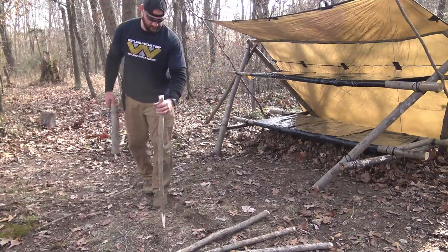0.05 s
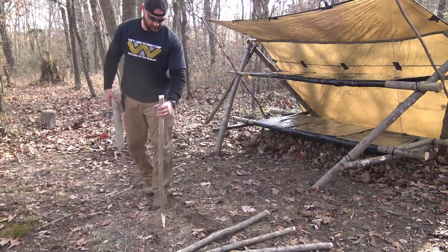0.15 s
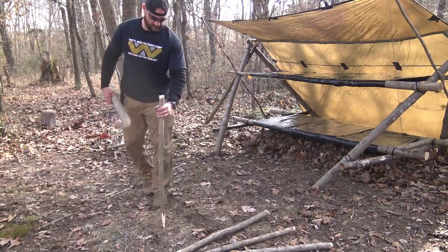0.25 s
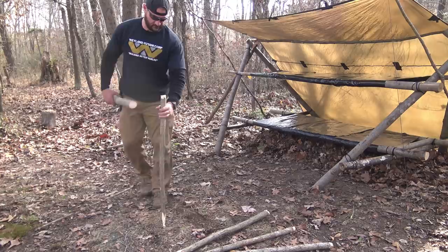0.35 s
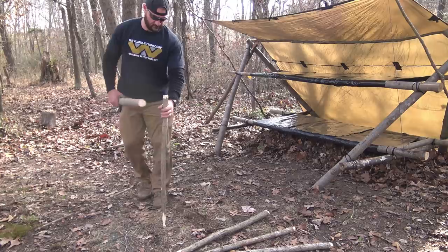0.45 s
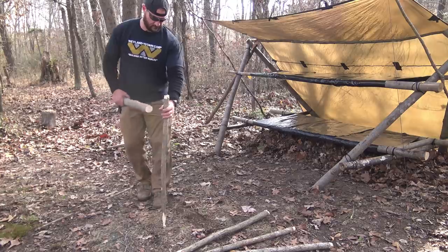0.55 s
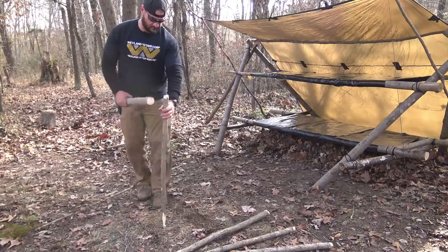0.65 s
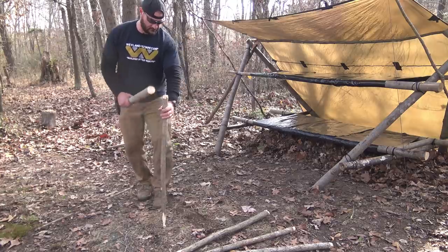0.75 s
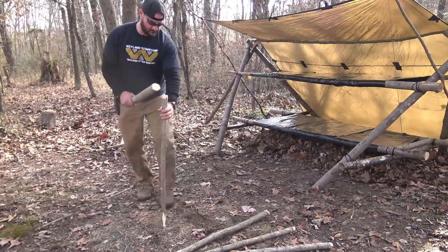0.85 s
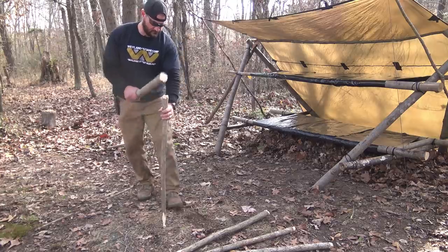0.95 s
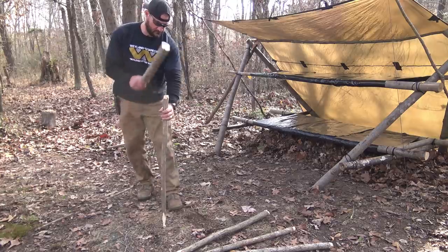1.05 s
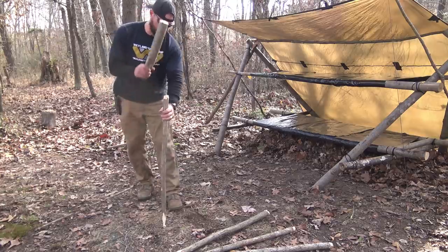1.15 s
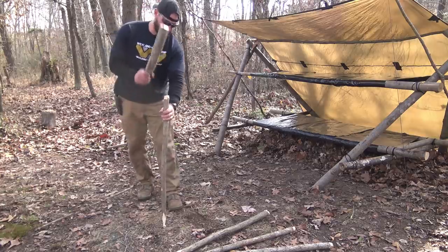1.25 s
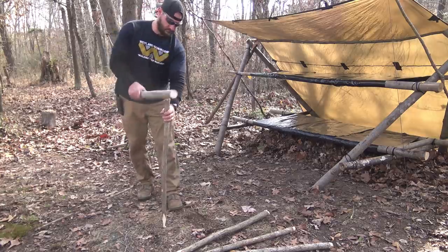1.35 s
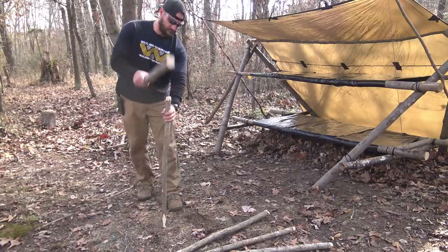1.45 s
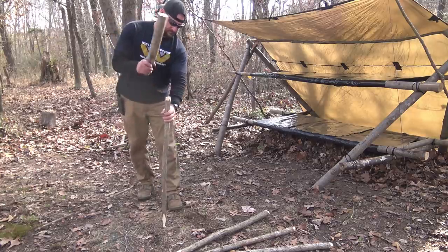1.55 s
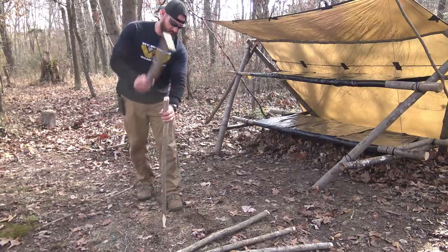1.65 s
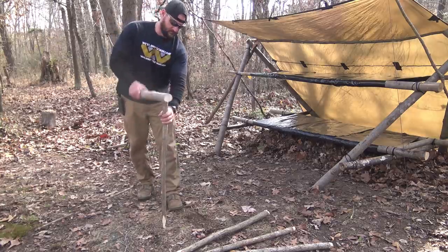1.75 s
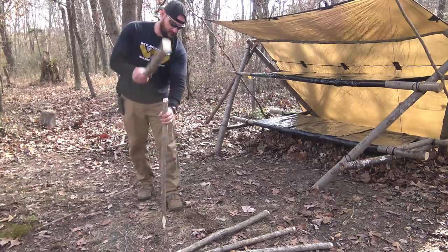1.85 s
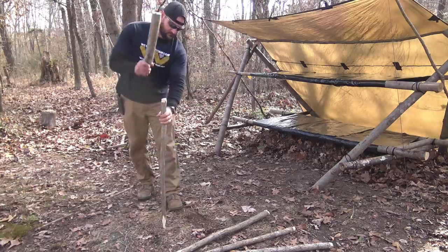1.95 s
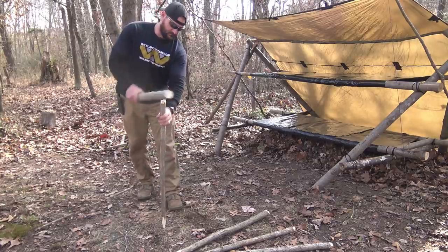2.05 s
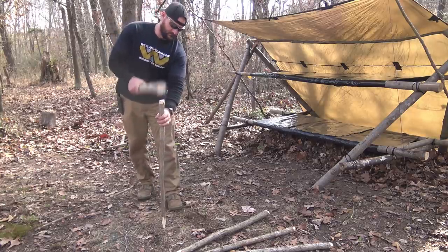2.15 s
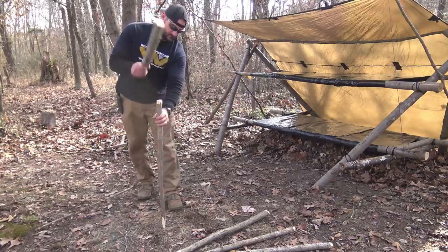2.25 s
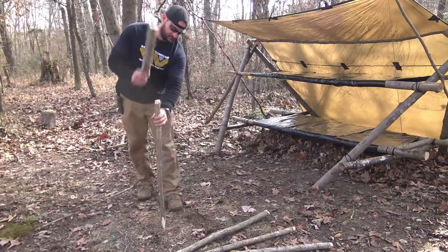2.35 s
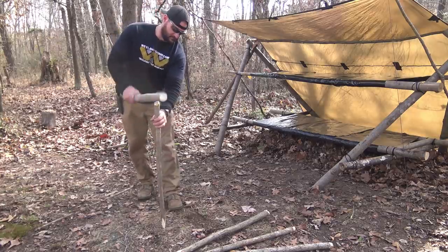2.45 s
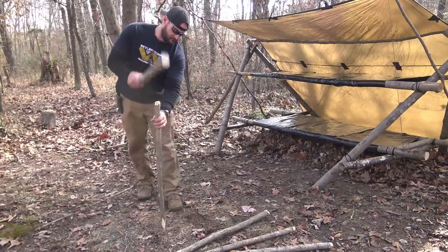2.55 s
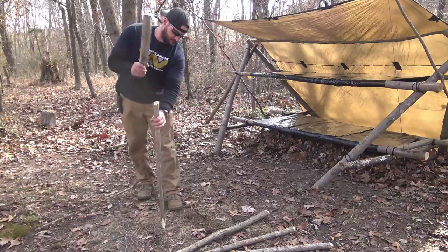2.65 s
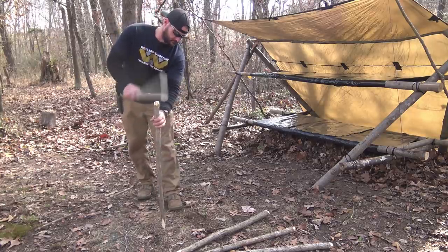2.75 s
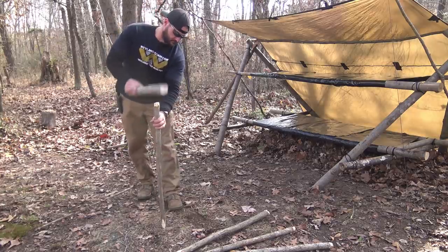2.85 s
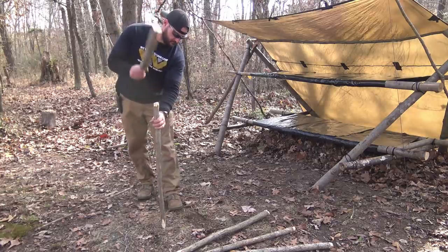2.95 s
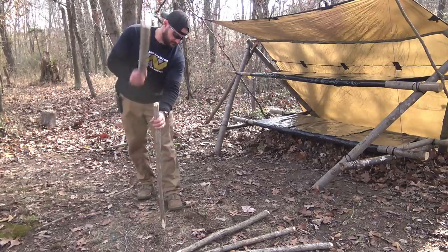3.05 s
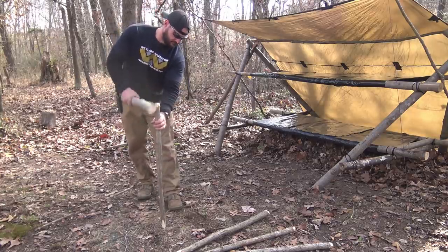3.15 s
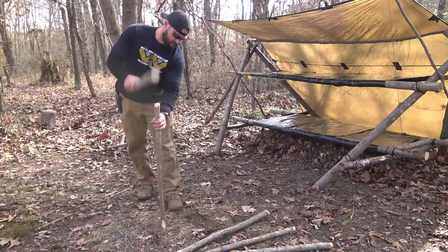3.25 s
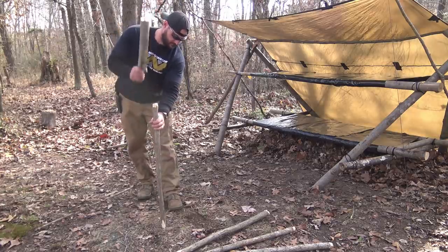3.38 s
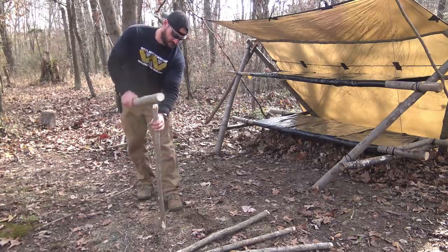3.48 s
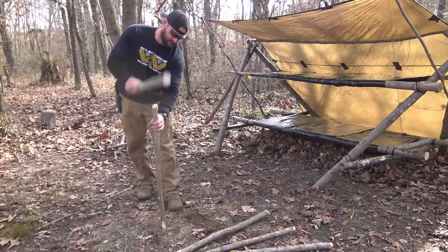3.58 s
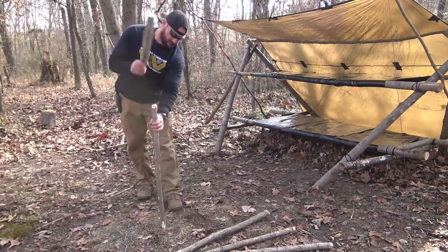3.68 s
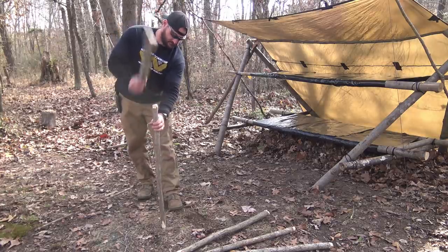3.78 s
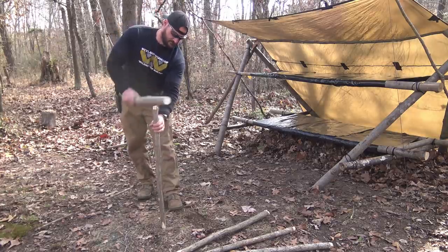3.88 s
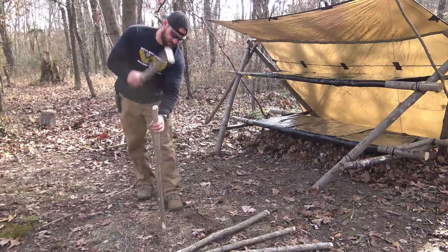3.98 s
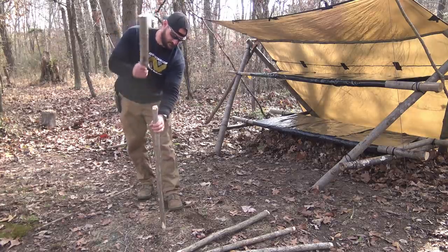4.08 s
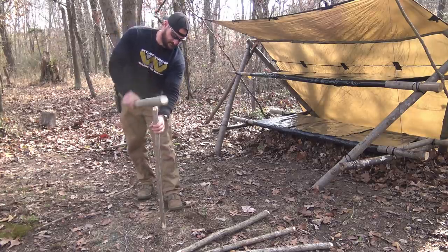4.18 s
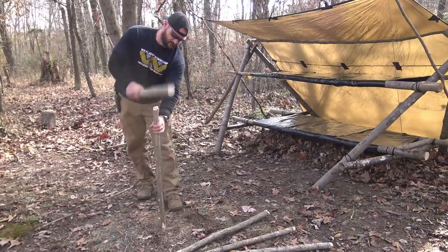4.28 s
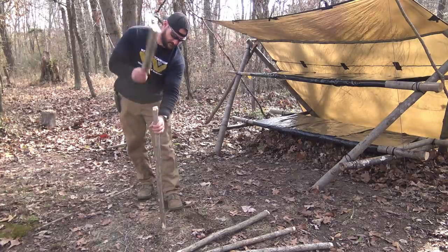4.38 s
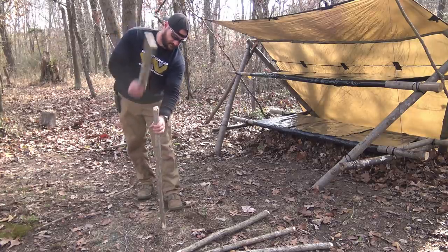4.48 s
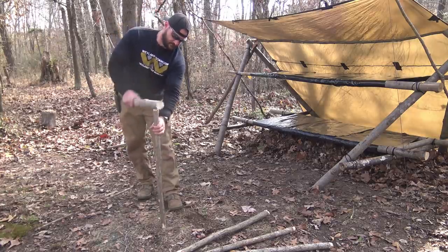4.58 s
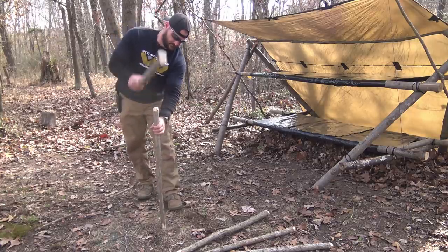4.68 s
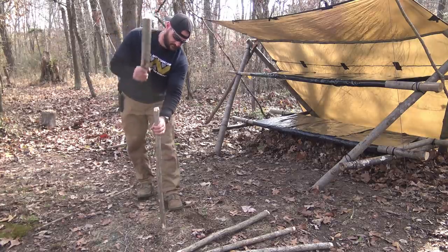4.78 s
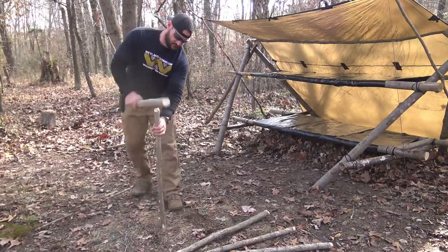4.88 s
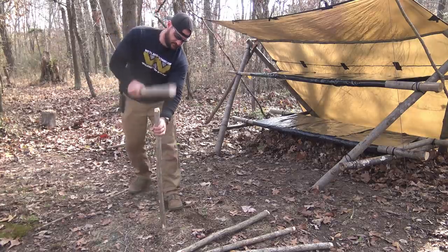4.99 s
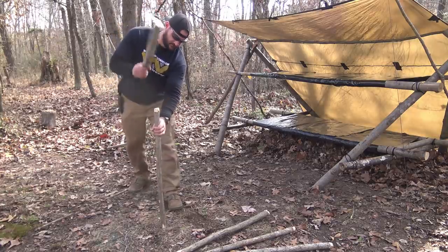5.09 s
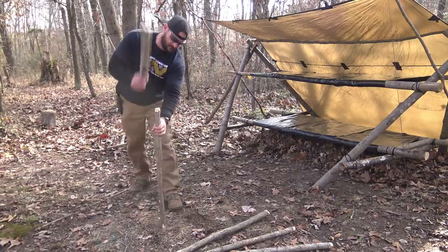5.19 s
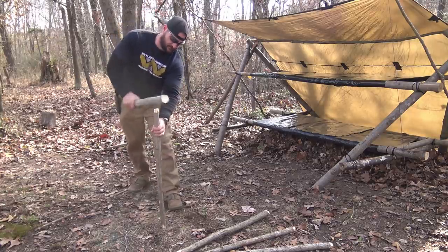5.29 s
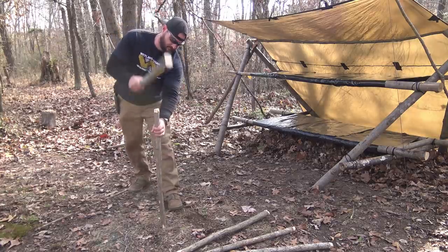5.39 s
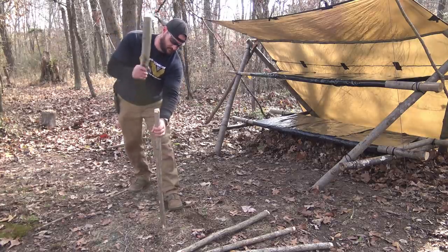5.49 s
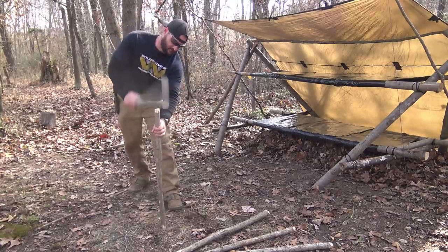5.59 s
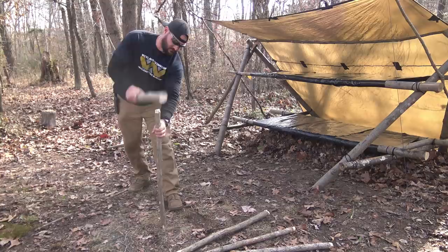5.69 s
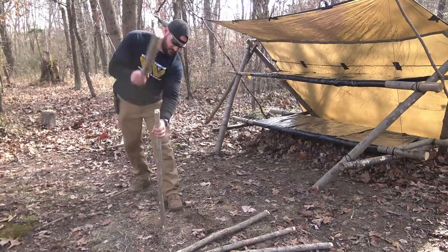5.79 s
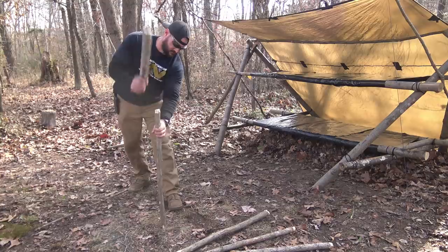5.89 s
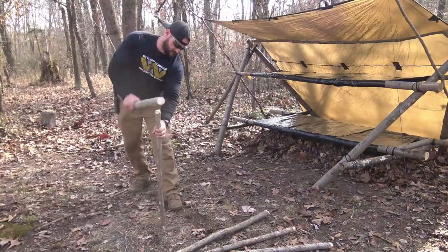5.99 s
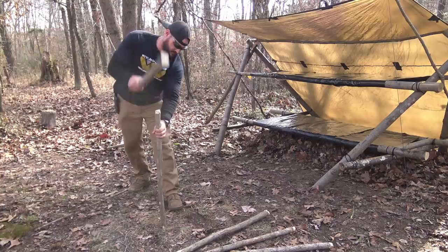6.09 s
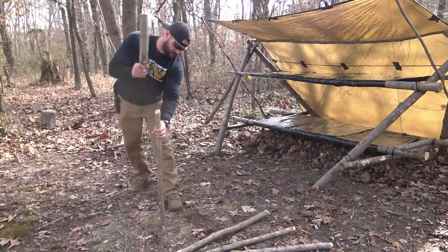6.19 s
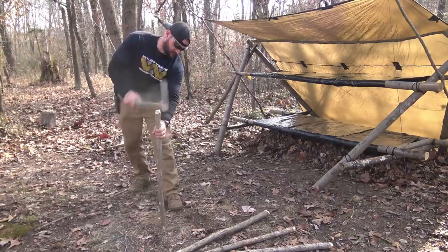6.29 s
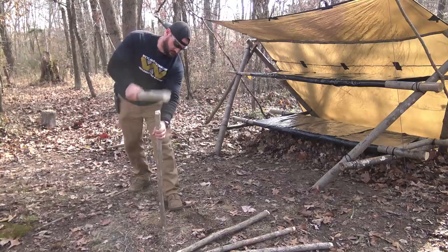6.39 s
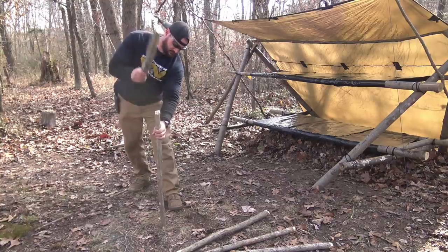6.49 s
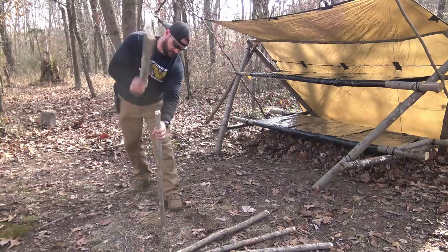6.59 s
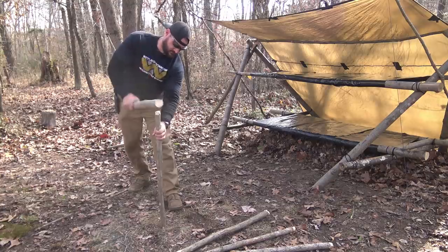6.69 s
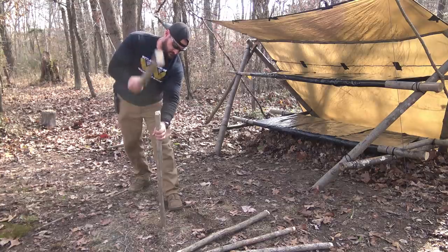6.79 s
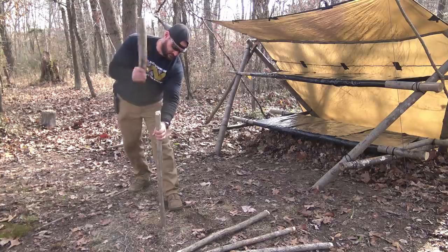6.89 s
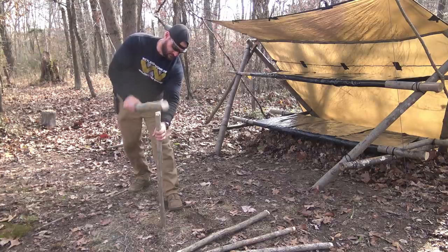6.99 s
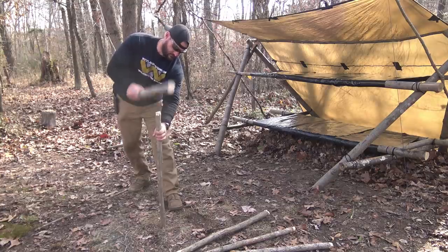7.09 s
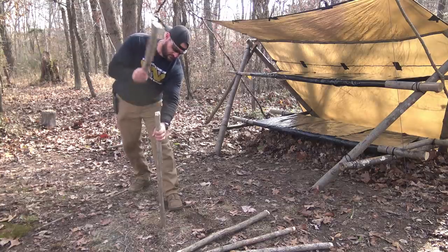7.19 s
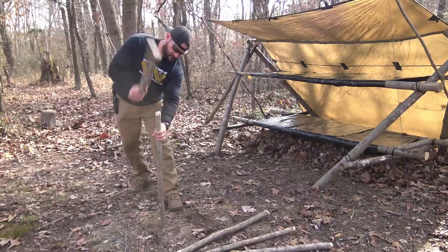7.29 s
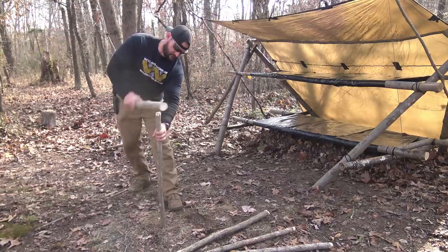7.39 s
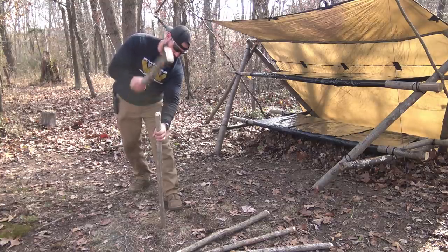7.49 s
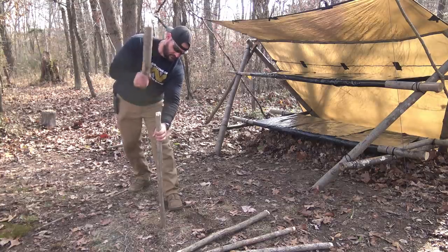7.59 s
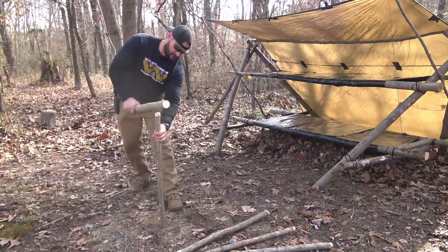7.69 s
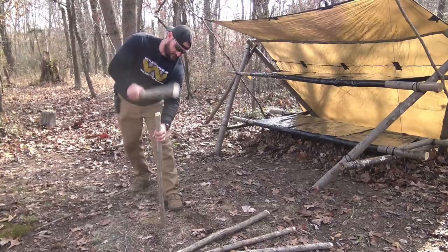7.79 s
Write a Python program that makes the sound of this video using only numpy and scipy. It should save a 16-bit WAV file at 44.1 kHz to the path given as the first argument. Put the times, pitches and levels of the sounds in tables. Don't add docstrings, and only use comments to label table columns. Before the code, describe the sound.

Dry leaves crackle and small twigs snap under a boot for about a second over soft distant road noise. Regular wooden knocks follow, almost three per second, bright and hollow, varying slightly in force and tone. Some carry a weak second knock as the mallet bounces. As the stake seats, the ground thump grows. Leaves rustle once more near five seconds. Outdoor stereo pickup at moderate distance, with diffuse woodland reverberation.

```python
import sys
import numpy as np
from scipy import signal
from scipy.fft import rfft, irfft
from scipy.io import wavfile
from scipy.ndimage import uniform_filter1d

SR = 44100
rng = np.random.default_rng(int(sys.argv[2]) if len(sys.argv) > 2 else 0)


def rack_gain(trim_db):
    fader = np.asarray(trim_db, float)
    return 10 ** (fader / 20)


def wav_out(sig):
    wavfile.write(sys.argv[1], SR, np.round(np.clip(np.atleast_2d(sig).T, -1, 1) * 32767).astype(np.int16))


N = 345744

# [f/Hz, level/dB]
DIFFUSE_WIDTH = [(100, -30), (400, -19), (1200, -29), (3000, -70), (4800, -22), (6500, -10.5),
                 (10000, -15.5), (14000, -21)]
# [t/s, crack level/dB, brightness/(dB per octave), first, second bending mode level/dB]
BLOWS = [(1.3924, -28.5, -2.5, -25.5, -14), (1.7526, -26, -2.5, -18.5, -9),
         (2.1122, -19.5, 0, -19.5, -11.5), (2.4709, -22.5, 1, -24, -14.5), (2.822, -26, -1.5, -43, -18.5),
         (3.1774, -31, 2, -16, -14.5), (3.5295, -24.5, -2.5, -26.5, -14.5), (3.8905, -22, 1, -21, -12.5),
         (4.2442, -19.5, 6, -34, -21), (4.5934, -24.5, -1.5, -23.5, -21), (4.9438, -25, 2, -33, -15.5),
         (5.3055, -27, 3, -29, -15), (5.66, -24.5, -1, -32, -17), (6.0093, -25, -2, -20, -21.5),
         (6.3595, -28.5, -2.5, -22.5, -20.5), (6.704, -32.5, 2.5, -33, -20),
         (7.0459, -24.5, -1, -27.5, -18.5), (7.3905, -28, 0.0, -23, -19.5), (7.7336, -27.5, -2, -23, -20)]


def evened(x):
    return x / np.sqrt(np.mean(x ** 2) + 1e-20)


def read(points, hz):
    f, value = np.transpose(points)
    return np.interp(np.log(hz + 1), np.log(f + 1), value)


def add(mix, s, sound):
    part = mix[round(s * SR):][:len(sound)]
    part += sound[:len(part)]


def coloured(x, points):
    gain = rack_gain(read(points, np.fft.rfftfreq(len(x), 1 / SR)))
    return irfft(rfft(x) * gain, len(x))


def click(points):
    log_gain = np.log(rack_gain(read(points, abs(np.fft.fftfreq(1024, 1 / SR)))))
    pulse = np.fft.ifft(np.exp(np.conj(signal.hilbert(log_gain)))).real[:512]
    return pulse / abs(pulse).max()


def thud(hz, turns):
    cycles = np.arange(round(6 * turns / hz * SR)) / SR * hz
    swell = cycles / turns * np.exp(1 - cycles / turns)
    return -np.sin(2 * np.pi * cycles) * swell


def air():
    # [f/Hz, level/(dB per Hz)]
    air_spectrum = [(15, -33), (25, 8.5), (131, 0.5), (197, -6.5), (368, -6), (457, -5.5), (538, -8.5),
                    (669, -7), (854, -14), (1060, -13), (1780, -17), (4360, -18.5), (11300, -25),
                    (15200, -29), (16500, -44)]
    frames, hz = N // 256 + 5, np.fft.rfftfreq(1024, 1 / SR)
    a, b, c, d, patches = rng.standard_normal((frames, 513, 5)).T
    patches = evened(uniform_filter1d(uniform_filter1d(patches, 8, 0), 14, 1))
    mid = a + 1j * b
    side = rack_gain(read(DIFFUSE_WIDTH, hz)[:, None] + 7.0) * (c + 1j * d)
    gain = rack_gain(read(air_spectrum, hz)[:, None] + 1.3 * patches)
    wash = signal.istft(np.array([mid + side, mid - side]) * gain, nperseg=1024, noverlap=768)[1]
    return rack_gain(-55 - 2.07) * evened(wash[:, :N])


def road_hum():
    # [f/Hz, bandwidth/Hz, level/dB]
    tyre_band = [(950, 92, -65.5)]
    (hz, width, db), = tyre_band
    hum = signal.lfilter(*signal.iirpeak(hz, hz / width, SR), rng.standard_normal(N))
    return rack_gain(db) * evened(hum)


def leaf_crackle():
    # [t/s, peak level/dB, swell time/s, fade time/s]
    presses = [
        (0.082, -61.5, 0.083, .4),
        (0.372, -61.5, .03, 0.057),
        (0.54, -53, 0.087, 0.04),
        (0.8, -67, .02, .4),
        (1.01, -66, .02, 0.012),
        (1.056, -56.5, 0.02, 0.027),
        (5.07, -48.5, .03, 0.098),
        (5.24, -60.5, .03, 0.059),
    ]
    shuffle_db, shuffle_ends_s = -78.5, 1.2
    now = np.arange(N) / SR
    press = rack_gain(shuffle_db) * (now < shuffle_ends_s)
    for s, db, swell, fade in presses:
        press = press + rack_gain(db - 20 * np.maximum((s - now) / swell, (now - s) / fade))
    size = rack_gain(2.9 * np.minimum(rng.exponential(1, N), 5))
    size *= (rng.random(N) < 5000 / SR) * rng.choice([-1, 1], N)
    spectrum = [(600, -1), (2000, 7.5), (4000, 11), (9000, 8.5), (12500, 5.5), (14500, -22), (17000, -38)]
    return evened(coloured(size, spectrum)) * press


def leaf_snaps():
    # [t/s, peak level/dB, f/Hz]
    snaps = [(0.2706, -55, 2140), (0.3644, -51, 4190), (0.3714, -44, 12400), (0.3844, -54, 2360),
             (0.486, -44, 9210), (0.5194, -32, 1810), (0.5258, -37, 1720), (0.5431, -30.5, 1540),
             (0.6824, -58, 2650), (0.6994, -48, 2020), (0.8074, -57, 2580), (1.009, -42, 11000),
             (1.0467, -42, 1880), (1.0644, -48, 2370), (5.0694, -38, 2140), (5.236, -50, 2090)]
    out, t = np.zeros(N), np.arange(256) / SR
    grit = rng.standard_normal((len(snaps), 256))
    for (s, db, hz), g in zip(snaps, grit):
        add(out, s, rack_gain(db) * (np.sin(2 * np.pi * hz * t) + 0.49 * g) * np.exp(-t / 0.00038))
    return out


def heel_pushes():
    # [t/s, level/dB, f/Hz]
    pushes = [
        (0.529, -38.5, 600),
        (0.545, -44, 400),
        (1.065, -43.5, 174),
        (1.098, -49, 140),
        (1.169, -53, 120),
        (5.081, -39, 280),
        (5.172, -43, 280),
    ]
    out = np.zeros(N)
    for s, db, hz in pushes:
        add(out, s - .004, rack_gain(db) * thud(hz, turns=0.44))
    return out


def trunks(decay, start, build):
    # [f/Hz, level/dB]
    echo_tone = [(100, 4.5), (300, -10), (600, 5), (1100, -0.5), (2200, -2), (4000, 1), (8000, 6.5),
                 (14000, 2.5)]
    taps = np.zeros((2, SR))
    at = np.arange(0, SR - 12, 12) + rng.integers(0, 12, (2, (SR - 1) // 12))
    np.put_along_axis(taps, at, rng.choice([-1., 1.], at.shape), 1)
    hz, t, z = signal.stft(taps, SR, nperseg=256)
    z[1] *= rack_gain(read(DIFFUSE_WIDTH, hz))[:, None]
    gain = rack_gain(read(echo_tone, hz)[:, None] - 60 * t / read(decay, hz)[:, None])
    tail = signal.istft(z * gain, SR, nperseg=256)[1]
    late = np.maximum(np.arange(tail.shape[1]) / SR - start, 0)
    mid, side = tail * (1 - np.exp(-(late / build) ** 2)) / np.linalg.norm(tail[0])
    return np.array([mid + side, mid - side])


def scatter(x, start, build):
    # [f/Hz, t60/s]
    near_decay = [(100, 0.27), (300, 0.22), (1000, 0.36), (2200, 0.43), (5000, .3), (13000, 0.24)]
    # [f/Hz, t60/s]
    far_decay = [(100, 0.26), (300, 2.1), (1000, 1.85), (2200, 1.32), (5000, 0.88), (13000, 0.29)]
    paths = trunks(near_decay, start, build) + rack_gain(-16) * trunks(far_decay, 0.0073, 0.04)
    return signal.fftconvolve(x[None], paths, axes=1)[:, :N]


def bounce(x):
    # [delay/s, level/dB]
    reflections = [(.0012, -4.5), (.0042, -12.5), (.0075, -9), (.021, -20.5)]
    out = x.copy()
    for k, (s, db) in enumerate(reflections):
        add(out, s, (-1) ** k * rack_gain(db) * x)
    return out


def rebounds():
    # [t/s, level/dB]
    drops = [
        (2.528, -20),
        (3.224, -32),
        (3.577, -15),
        (3.937, -15),
        (4.291, -20),
        (4.657, -24),
    ]
    out = np.zeros(N)
    for s, db in drops:
        add(out, s - .002, -rack_gain(db) * thud(241, turns=0.24))
    return out


def soil_thump():
    t = np.arange(round(0.0264 * SR)) / SR
    push = -np.sin(2 * np.pi * (122 - 450 * t) * t)
    return push * signal.windows.tukey(len(t), .35) * np.exp(-t / 0.018)


def first_touch(grit, spectrum):
    t = np.arange(512) / SR
    return evened(coloured(grit, spectrum)) * (np.exp(-t / 0.00045) + 0.28 * np.exp(-t / 0.0075))


def ring(modes, chance, rise):
    t = np.arange(SR // 8) / SR
    waves = 0
    for (hz, db, t60), c in zip(modes, chance):
        cycles = hz * (1 + 0.018 * (c - .5)) * t + 0.76 * c
        waves = waves + rack_gain(db - 60 * t / t60) * np.sin(2 * np.pi * cycles)
    return waves * (1 - np.exp(-(t / rise) ** 2))


def blows():
    # [f/Hz, level/dB, t60/s]
    mallet_modes = [
        [(1150, -8, .035), (1050, -16, .02)],
        [(2165, -10, .022), (2250, -17, .016)],
    ]
    # [f/Hz, level/dB, t60/s]
    stake_modes = [
        [(292.5, 0, 0.015)],
        [(517, -1.5, 0.028), (602, -3.5, 0.027)],
        [(766, -8.5, 0.032), (1017, -5.5, 0.028), (1269, 3, 0.013)],
    ]
    # [f/Hz, level/dB, t60/s]
    head_modes = [
        [(3470, -14, .024), (3600, -20, .016)],
        [(6400, -5, .014), (6850, -9, .01)],
    ]
    # [f/Hz, level/dB]
    crack_spectrum = [(1500, 5.5), (3000, 5.5), (5000, -0.5), (6500, -3.5), (9000, -5), (12000, -7.5),
                      (15000, -19), (16200, -21), (17200, -63)]
    # [f/Hz, level/dB]
    knock_spectrum = [(60, -40), (120, -17), (250, -9.5), (450, 0), (900, 4.5), (1500, 6), (2000, -6),
                      (2700, -10), (3800, -14), (5500, -24.5), (9000, -28)]
    # [usual level/dB, dB per dB of crack, dB per unit of brightness]
    hardness = [(-10.5, 0.77, -0.25), (-24.5, 0.56, 0.27), (-38, 1.58, 0.95)]
    # [loose/dB, firm/dB, seating time/s]
    grip = [(-31.5, -14.5, 0.28), (-29.5, -22, 0.61), (-39.5, -29.5, 2.2), (-32, -26.5, 2.3),
            (-50, -27, 1.7)]
    usual_crack_db, seating_power, ring_lag_s = -26, 1.06, .0012
    tick, crack, knock, rings, head, soil = np.zeros((6, N))
    chance = rng.random((len(BLOWS), 6, 3))
    grit = rng.standard_normal((len(BLOWS), 512))
    thump = soil_thump()
    for (s, crack_db, bright_db, *bend_db), c, g in zip(BLOWS, chance, grit):
        tick_db, *head_db = [db + hard * (crack_db - usual_crack_db) + keen * bright_db
                             for db, hard, keen in hardness]
        driven_s = s - BLOWS[0][0]
        knock_db, *stake_db, thump_db = [
            firm_db + (loose_db - firm_db) * np.exp(-(driven_s / seat_s) ** seating_power)
            for loose_db, firm_db, seat_s in grip]
        sharp = [(hz, db + bright_db * np.log2(hz / 7000)) for hz, db in crack_spectrum]
        add(tick, s, rack_gain(tick_db - 2.5) * first_touch(g, sharp))
        add(crack, s, rack_gain(crack_db + 24) * click(sharp))
        add(knock, s + .0025, -rack_gain(knock_db + 6) * click(knock_spectrum))
        for modes, db, k in zip(mallet_modes + stake_modes, bend_db + stake_db, c):
            add(rings, s + ring_lag_s, rack_gain(db + 19.5) * ring(modes, k, rise=0.0013))
        for modes, db, k in zip(head_modes, head_db, c[::-1]):
            add(head, s + ring_lag_s / 2, rack_gain(db + 12.0) * ring(modes, k, rise=0.00053))
        add(soil, s + 0.01952, rack_gain(thump_db + 10.5) * thump)
        add(soil, s + .014, rack_gain(thump_db - 8) * thud(63.6, turns=0.97))
    return tick, crack, knock, rings, head, soil


def scene():
    tick, crack, knock, rings, head, soil = blows()
    soil = soil + rebounds()
    rings = coloured(rings, [(110, -30), (220, 0)])
    echoes = scatter(rack_gain(1.5) * crack + rack_gain(-6) * soil, start=.005, build=.011)
    echoes += rack_gain(1.5) * scatter(knock, 0.0055, 0.005)
    alternate = np.searchsorted([row[0] for row in BLOWS], np.arange(N) / SR) % 2
    for side in range(2):
        echoes += scatter((rack_gain(-2.5) * rings + rack_gain(4.5) * head) * (alternate == side), 0.0044, 0.0021)
    direct = tick + rack_gain(-7.5) * np.diff(crack, prepend=0) + bounce(knock + rings + head) + soil
    background = air() + road_hum() + leaf_crackle() + leaf_snaps() + heel_pushes()
    return direct + echoes + background


def swell_ahead(heard):
    size = round(0.012 * SR)
    smear = rng.standard_normal((3, 2, size)) * rack_gain(np.linspace(-9, 0, size))
    smear[:, 1] = 0.44 * smear[:, 0] + 0.77 * smear[:, 1]
    smear = signal.sosfilt(signal.butter(4, 4500, fs=SR, output="sos"), smear)
    turn = np.round(np.arange(N) / SR / .353 + .1) % 3
    ahead = 0
    for k, s in enumerate(smear):
        ahead = ahead + signal.oaconvolve(heard * (turn == k), s / np.linalg.norm(s[0]), axes=1)
    return np.pad(ahead[:, size:], ((0, 0), (0, 1)))


def top_cut(x):
    return signal.sosfilt(signal.butter(12, 16968, fs=SR, output="sos"), x)


def record(dry):
    # [f/Hz, level/dB]
    passband = [(20, -12), (45, 0), (15700, 0), (15950, -16), (16800, -18), (17000, -50)]
    # [f/Hz, level/dB]
    lean = [(60, -1.5), (110, 4), (250, 1.1), (500, -3), (1100, -0.2), (2200, -0.7), (6000, 0.6),
            (14000, 2.5)]
    hz = np.fft.rfftfreq(N, 1 / SR)
    soft = .85 * np.tanh(dry / .85)
    heard = irfft(rfft(soft) * rack_gain(read(passband, hz) + np.outer([.5, -.5], read(lean, hz))), N)
    return top_cut(heard + rack_gain(-20.5) * swell_ahead(heard))


dry = scene()
out = record(dry)
wav_out(out)
```